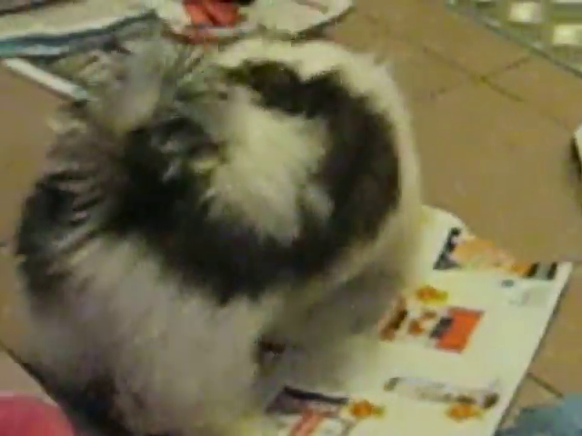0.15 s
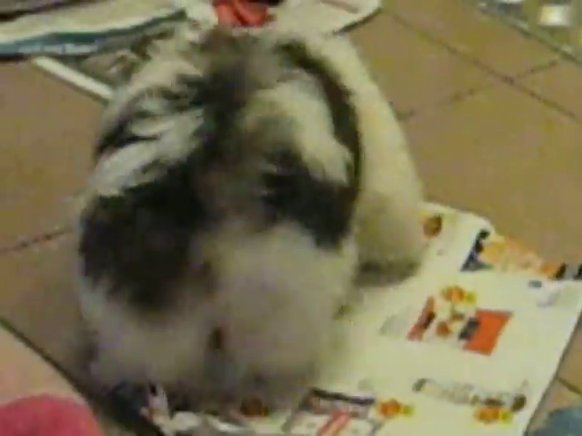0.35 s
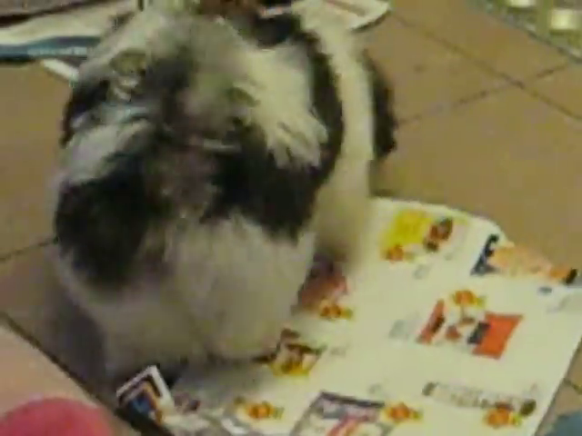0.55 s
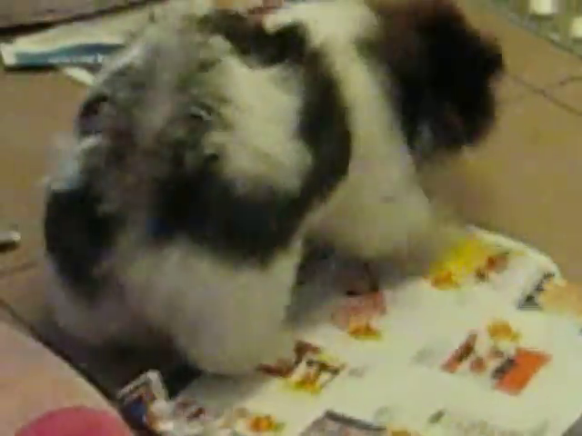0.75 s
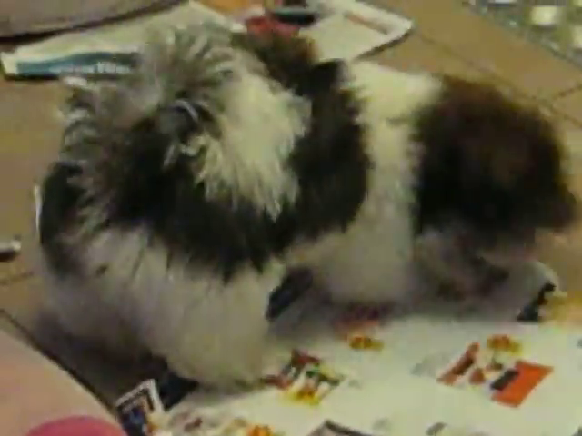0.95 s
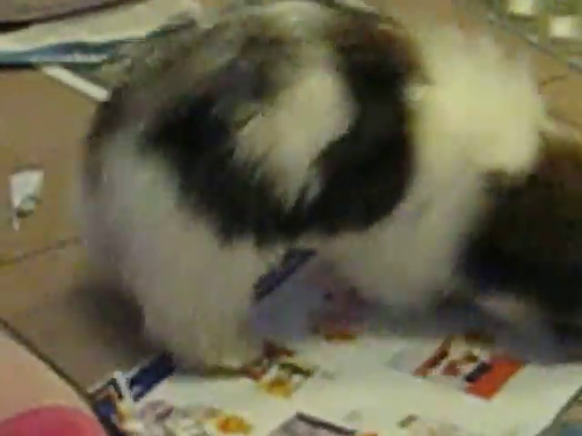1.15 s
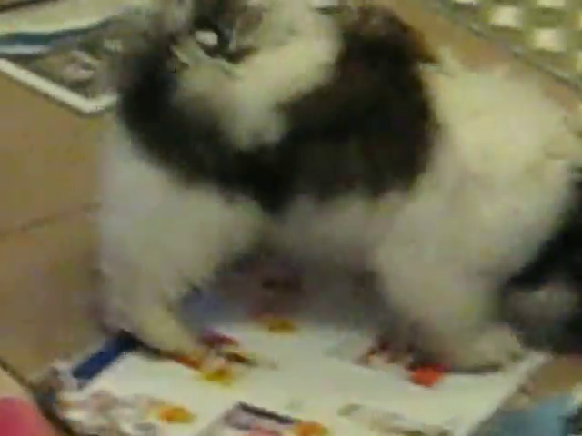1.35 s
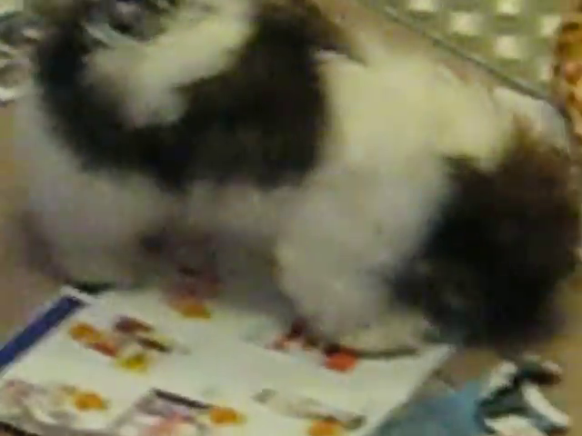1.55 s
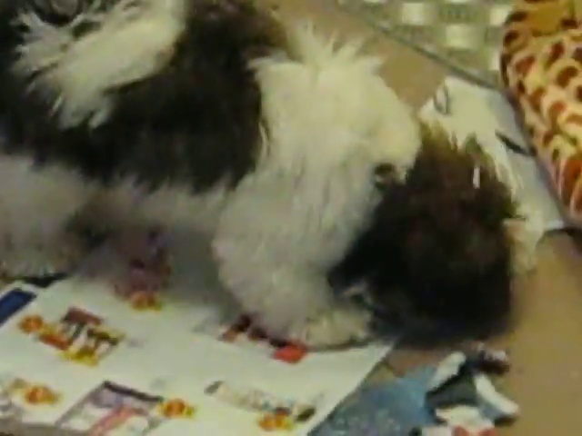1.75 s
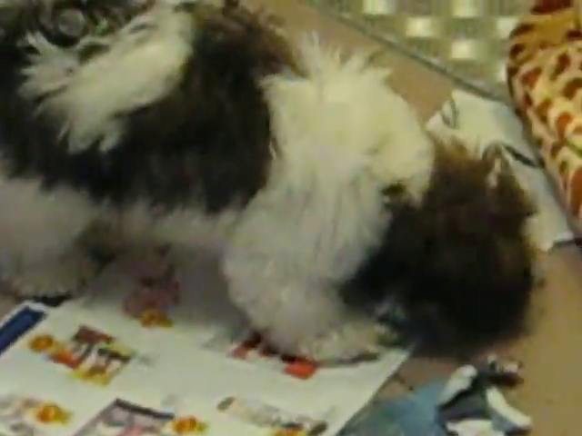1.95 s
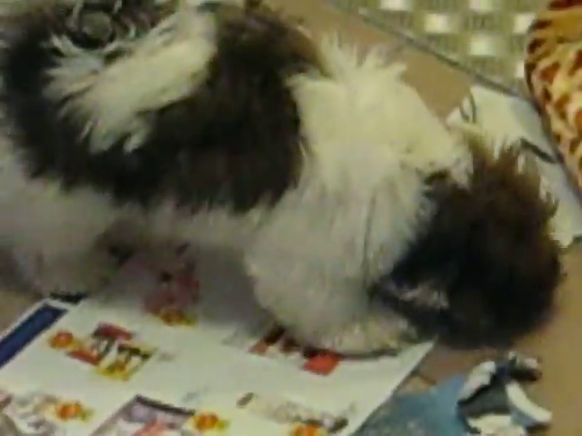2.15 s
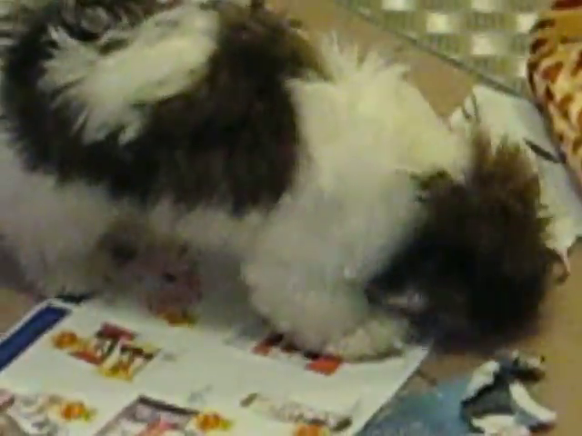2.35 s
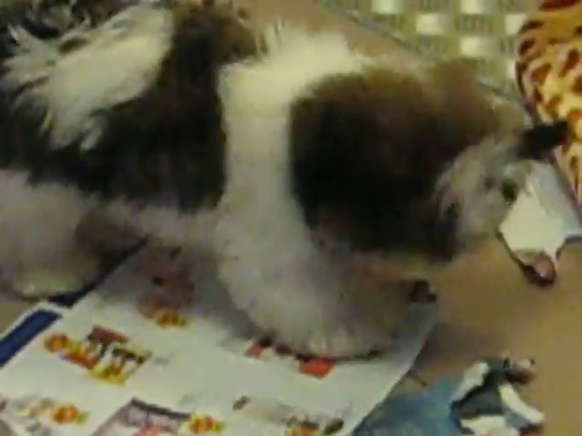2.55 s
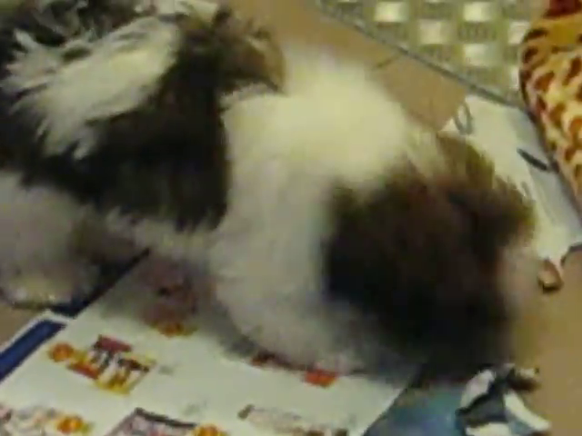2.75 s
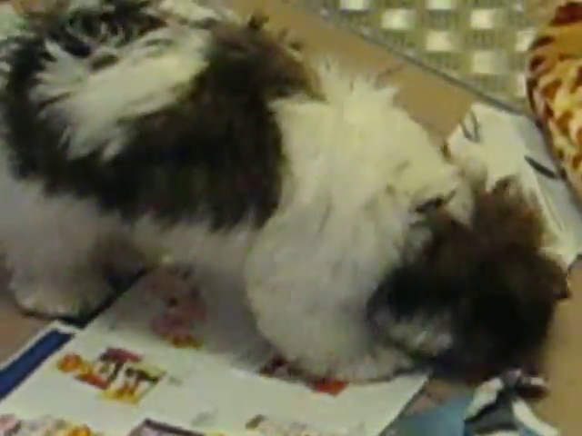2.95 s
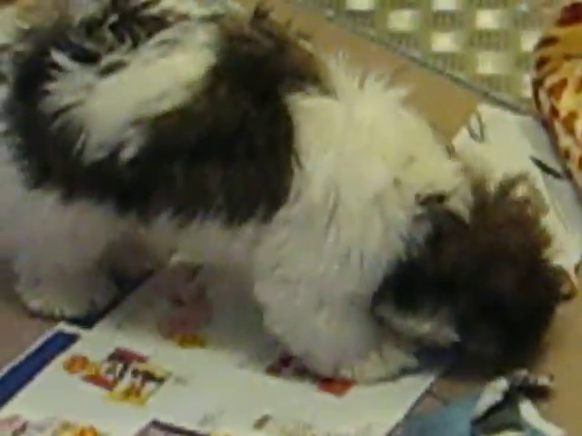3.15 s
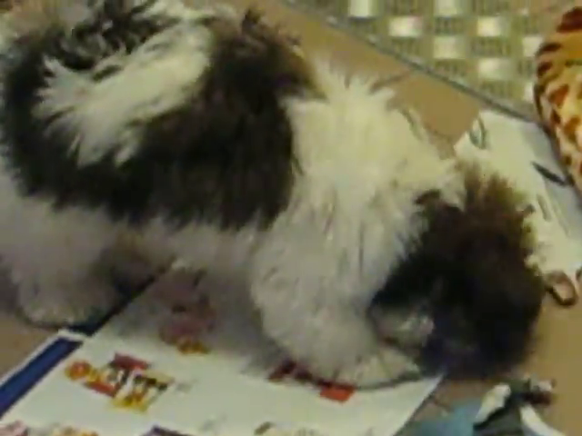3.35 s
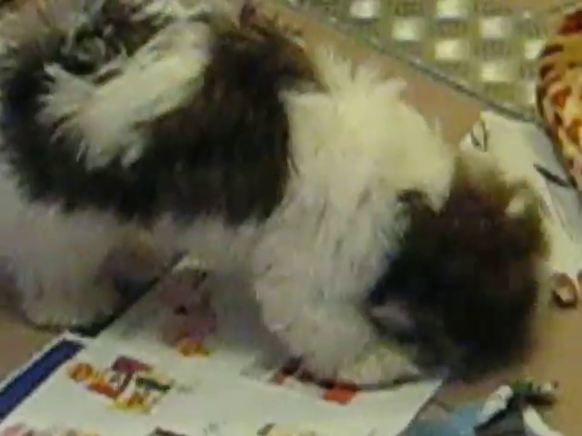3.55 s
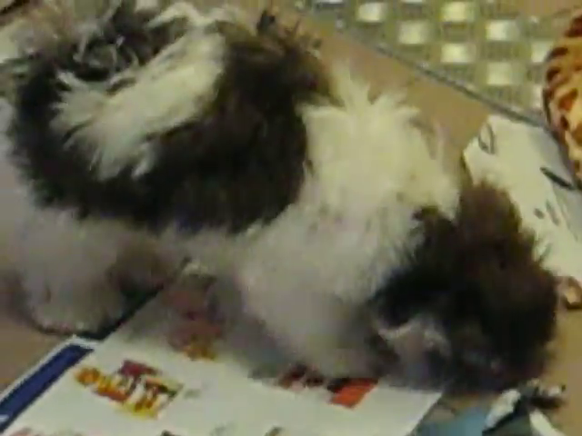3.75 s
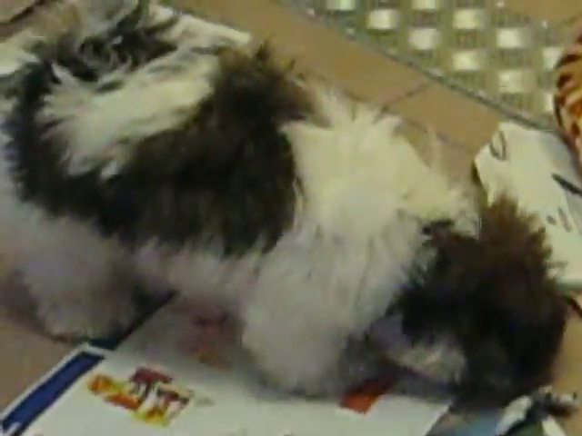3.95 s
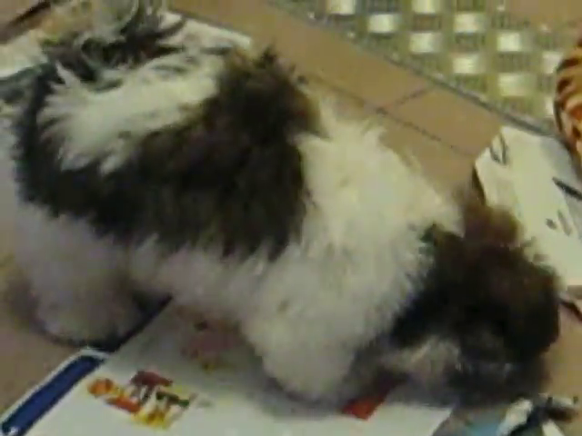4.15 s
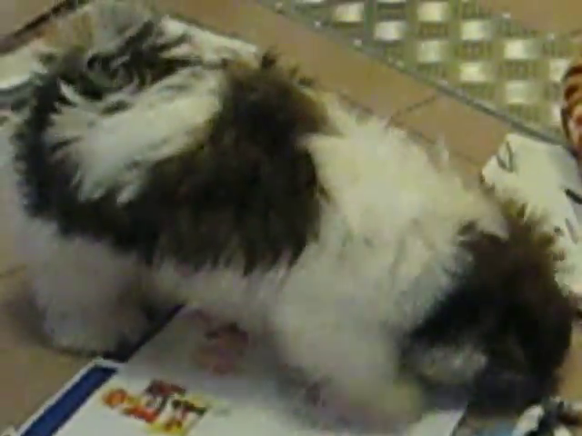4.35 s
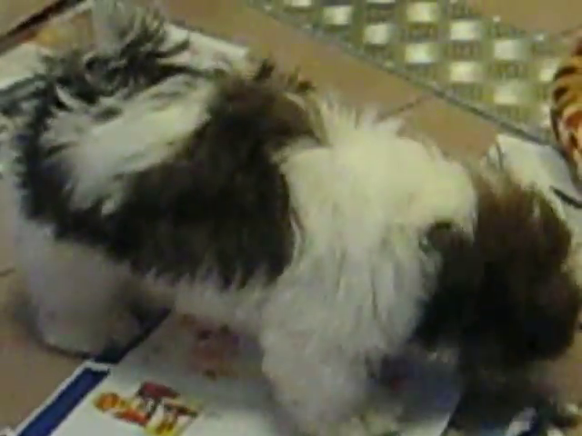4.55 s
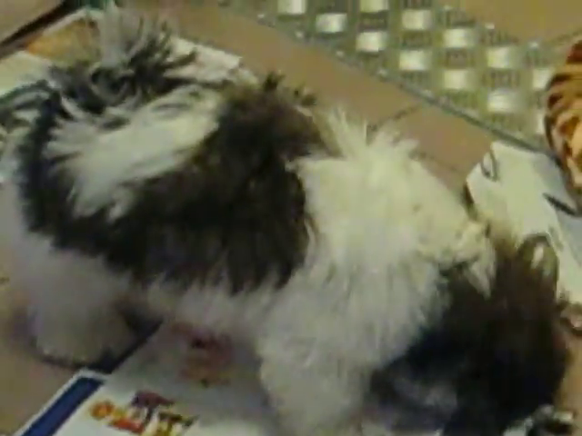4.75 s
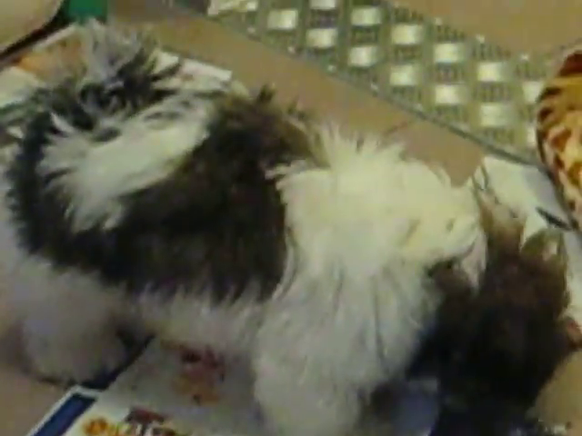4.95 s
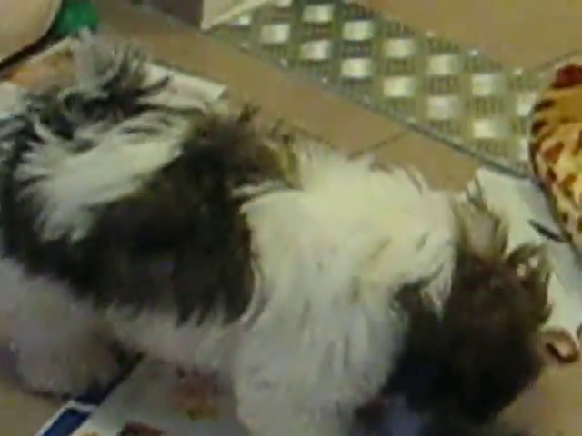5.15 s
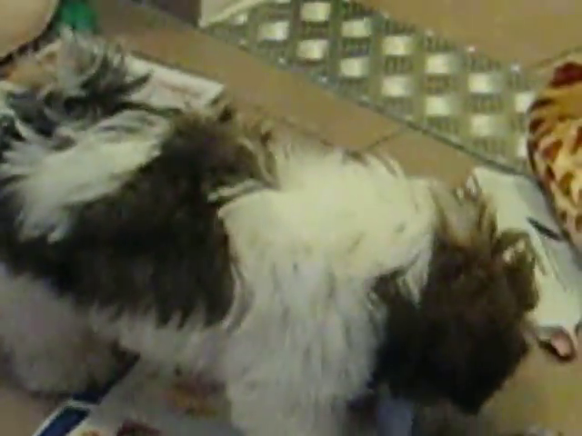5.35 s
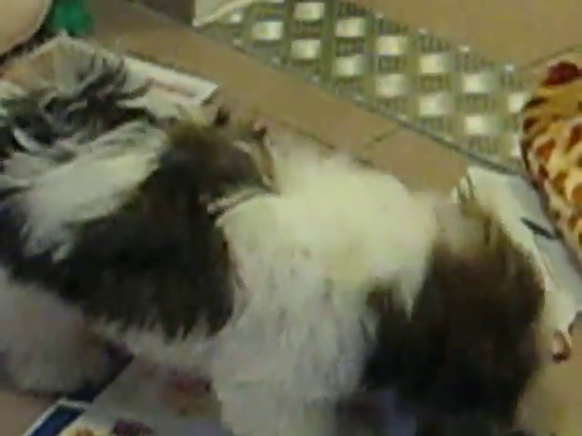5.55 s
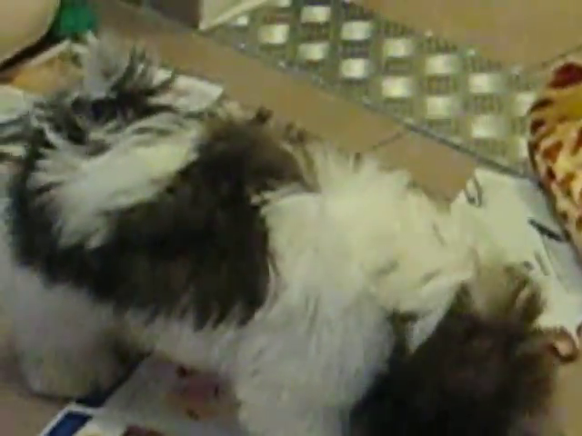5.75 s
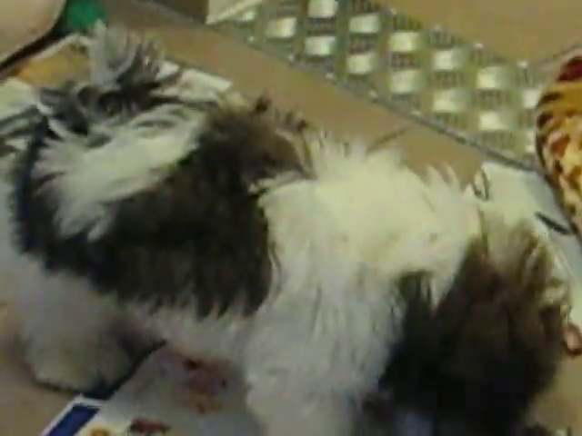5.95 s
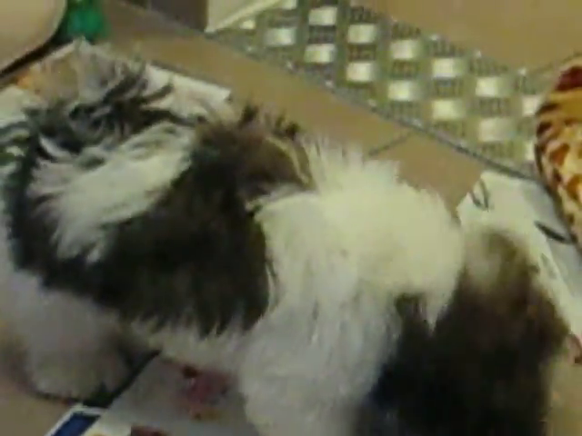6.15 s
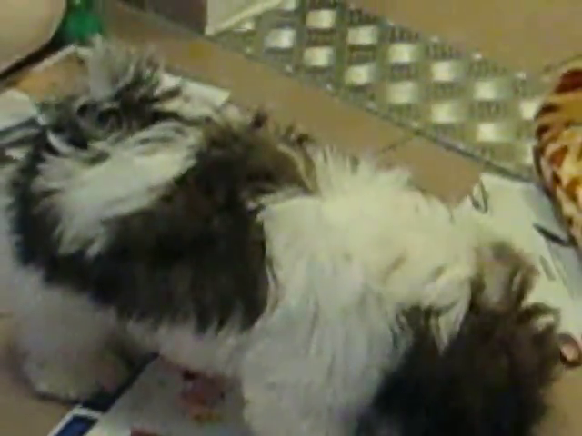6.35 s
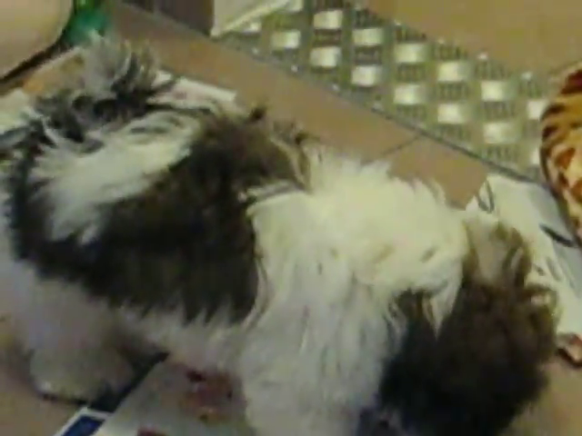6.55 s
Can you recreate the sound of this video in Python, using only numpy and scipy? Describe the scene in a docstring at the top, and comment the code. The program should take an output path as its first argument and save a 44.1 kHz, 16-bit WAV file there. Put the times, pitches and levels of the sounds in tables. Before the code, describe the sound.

A puppy handles paper on a hard hallway floor, heard close through a small mono camera microphone with constant soft hiss and a thin, very high electronic whine. In the first second, light rustling carries a very faint low squeak and crisp snaps, strongest near 0.75. Around 1.05, a brief rising squeak, claw scrape, snap and soft paw thuds come together. Rustling thins out until an abrupt, coarse rip at 2.4, which quickly fades. From about 2.7 to 3.8 it is nearly quiet, with only tiny ticks. A bright snap at 4.0 restarts the activity; a cluster follows around 4.35 with light thuds. From 4.7 the crackles thicken, with a strong scraping tear at 5.35. Dense snaps, flaps and heavier crumpling continue from 5.6 to 6.4, then shorter rustles and scrapes run to the end near 6.7. A short hallway echo surrounds the paper.

```python
"""A puppy tramples, tugs and tears sheets of paper on a hard hallway floor, close to a small mono camera.
Creases snap as short ring pairs with noise bursts; rustle is clumped random crackles shaped by moving humps.
Claws rasp as noise through resonances, paws thud as dying low modes, soft squeaks slide in pitch.
Sparse random taps ring as the hallway; the camera adds shaped-noise hiss and a thin high whine of sines."""
import sys
import numpy as np
from scipy import signal
from scipy.fft import rfft, irfft
from scipy.io import wavfile
from scipy.ndimage import uniform_filter1d

SR = 44100
rng = np.random.default_rng(int(sys.argv[2]) if len(sys.argv) > 2 else 0)


def ratio(d):
    """dB to gain"""
    e = np.asarray(d, float) / 20
    return 10 ** e


def master(y):
    """Save y as 16-bit WAV."""
    cut = np.clip(np.atleast_2d(y).T, -1, 1)
    pcm = np.round(cut * 32767)  # scale
    wavfile.write(sys.argv[1], SR, pcm.astype(np.int16))


N = 295470

# louder creases that snap: (time [s], relative level [dB], low ring [Hz],
# treble balance re level [dB], flap balance re level [dB])
CREASE_SNAPS = [(0.3454, -30, 5520, -15, -27), (0.4289, -21, 5600, -23, -33), (0.7344, -30, 6650, -10, -36),
                (0.7569, -5, 5850, -8, -39), (0.7678, -15, 6710, -14, -33), (1.0696, -11, 2370, -36, -14),
                (1.09, -22, 5490, -15, -32), (1.1114, -21, 5500, 2, -32), (1.3015, -25.5, 3600, -1, -30),
                (1.7797, -32, 4600, 3, -30), (1.797, -32, 7140, -17, -26), (1.86, -32, 7180, 0, -25),
                (2.37, -29, 2110, 3, -20), (2.3748, -26, 1990, 4, -6), (2.392, -16, 4850, -4, -22),
                (2.422, -14, 4850, 3, -30), (2.428, -13, 2090, 5.5, -15), (3.304, -41, 2590, -5, -16),
                (3.3204, -40, 6850, 2, -15), (3.676, -40.5, 6850, 4, -24), (3.8472, -31, 5570, -28, -28),
                (3.8731, -19.5, 6750, -29, -36), (3.9786, -5, 6500, -2, -39), (4.0045, -11, 7120, -18, -42),
                (4.201, -21.5, 6470, -20, -27), (4.2294, -19.5, 6000, -8, -31), (4.261, -19, 6350, -6, -38),
                (4.271, -27, 7000, 0, -30), (4.3361, -9.5, 5850, -12, -32), (4.352, -8, 6680, -19, -16.5),
                (4.36, -10.5, 4100, -16, -26), (4.3828, -12, 6800, -9, -27), (4.5512, -30, 3440, -19, -27),
                (4.6604, -15.5, 3130, -29, -35), (4.6714, -30, 3120, -26, -12),
                (4.6832, -18, 4000, -29, -29), (4.7424, -21, 3900, -26, -26), (4.81, -15, 3600, -26, -32),
                (4.8284, -19, 2340, 5, -41), (4.8396, -9.5, 4800, -20, -21),
                (4.8466, -13.5, 3600, -19, -2.5), (4.894, -14, 6000, -16, -16),
                (4.9101, -12, 5850, -10, -49), (4.924, -22, 4120, -10, -31), (5.0164, -19, 2450, -27, -28),
                (5.0499, -21.5, 1600, -16, -7), (5.106, -27, 3880, -14, -22), (5.1224, -28, 4870, -15, -19),
                (5.1475, -28, 2470, -3, -27), (5.182, -25, 4150, -8, -17), (5.192, -6.5, 4800, -8, -40),
                (5.231, -15, 5040, -8, -30), (5.246, -9, 4850, -7, -32), (5.2634, -12, 6200, -9, -25),
                (5.2752, -15, 6600, -7, -35), (5.3374, -26, 3530, -15, -28), (5.3471, -3.5, 3840, -6, -29),
                (5.5269, -15.5, 3800, -25, -7), (5.5324, -18.5, 3500, -7, -18),
                (5.5811, -14.5, 2330, -5, -30), (5.6137, -9.5, 3510, 0.5, -36),
                (5.6286, -4.5, 5430, -9, -33), (5.715, -13.5, 4300, -7, -30),
                (5.7306, -8.5, 3670, -10, -19), (5.7637, -11, 4320, -7, -18), (5.7881, -19, 1970, 2, -19),
                (5.815, -3.5, 5100, -10, -16), (5.8218, -9, 1650, -23, -17), (5.8863, -19.5, 1740, -7, -23),
                (5.9266, -10.5, 1960, -14, -22), (5.9348, -11, 1940, -10, -8), (5.9503, -5, 6290, -7, -21),
                (5.962, -9, 6770, -18, -21), (6.1117, -23, 3580, -25, -25), (6.1678, -20.5, 1520, -17, -1),
                (6.1903, -3, 3900, -14, -29), (6.2582, -5.5, 4870, -9, -33), (6.277, -12, 5530, -4, -32),
                (6.2884, -12, 3500, -19, -28), (6.3062, -13, 3740, -12, -1), (6.3494, -18.5, 1530, -4, 1),
                (6.3987, -10.5, 4600, -11, -8), (6.415, -14, 2100, -13, -22), (6.621, -20, 3580, -10, -19),
                (6.6479, -16, 2000, -26, -1), (6.6784, -17, 3700, -14, -21)]


def evened(x):
    """Scales to rms 1."""
    return x / np.sqrt(np.mean(x ** 2) + 1e-20)


def read(points, hz):
    """Value of a (Hz, value) table on a log-frequency axis."""
    f, value = np.transpose(points)
    return np.interp(np.log(hz + 1), np.log(f + 1), value)


def add(mix, start_s, sound):
    """Mixes a sound in at start_s."""
    part = mix[round(start_s * SR):][:len(sound)]
    part += sound[:len(part)]


def ring(hz, t60_s, phase_turns, rise_s=0.000071):
    """One dying mode with a quick soft start."""
    t = np.arange(round(min(t60_s, .6) * SR) + 8) / SR
    envelope = ratio(-60 * t / t60_s) * (1 - np.exp(-t / rise_s))
    return envelope * np.sin(2 * np.pi * (hz * t + phase_turns))


def band(x, centre_hz, width_hz):
    """A broad resonance with steep sides."""
    edges_hz = np.clip([centre_hz - width_hz / 2, centre_hz + width_hz / 2], 50, 20000)
    return signal.sosfilt(signal.butter(2, edges_hz, "bandpass", fs=SR, output="sos"), x)


def resonate(x, hz, width_hz):
    """A resonance of gain 1: shift to 0 Hz, one-pole lowpass, shift back."""
    turn = np.exp(2j * np.pi * hz * np.arange(len(x)) / SR)
    r = np.exp(-np.pi * width_hz / SR)
    return 2 * (turn * signal.lfilter([1 - r], [1, -r], x / turn)).real


def movement(t):
    """Tugs swell and fade over the idle rustle; their power-weighted mean sets body colour and bass weight."""
    # single tugs, steps and tears: (peak time [s], rise per 20 dB [s], fall per 20 dB [s],
    # relative peak level [dB], body centre [Hz], bass weight [dB])
    tug_table = [(0, .05, 0.063, -39.5, 5480, -16), (.43, 0.11, 0.28, -37.5, 5500, -8),
                 (.49, 0.13, 0.04, -33, 5330, -30), (.758, 0.034, 0.17, -35, 6300, -18),
                 (1.075, 0.013, 0.16, -40, 2790, -5.5), (1.13, 0.088, 0.25, -37, 5450, -6),
                 (1.33, 0.15, 0.095, -44.5, 4350, -10.5), (1.48, 0.08, 0.29, -49.5, 5560, -4),
                 (1.82, 0.12, .3, -51, 5000, -6.5), (2.376, 0.011, .1, -34.5, 3000, -1),
                 (2.394, .008, 0.24, -23.5, 4300, -6.5), (2.431, 0.046, 0.12, -19.5, 3780, -5.5),
                 (3.88, 0.092, 0.064, -53, 5360, -20), (3.98, .012, 0.18, -38, 6340, -23),
                 (4.01, 0.049, 0.12, -33.5, 5240, -20), (4.23, 0.066, 0.31, -39.5, 5070, -19),
                 (4.35, .04, 0.088, -32.5, 4370, -13.5), (4.4, 0.1, 0.11, -34, 3950, -7),
                 (4.66, 0.14, 0.24, -41.5, 3200, -3), (4.78, .2, .15, -52.5, 4480, -17),
                 (4.83, 0.026, 0.17, -36.5, 3700, -6), (4.93, .3, 0.095, -40, 5520, -14),
                 (5.02, .02, .09, -39.5, 3230, -11), (5.055, .012, .15, -45.5, 2850, 3),
                 (5.19, .04, 0.24, -37, 4700, -13.5), (5.28, 0.2, 0.028, -32, 5170, -9.5),
                 (5.348, 0.011, .058, -21.5, 3860, -6), (5.53, .02, 0.22, -40, 3660, -4),
                 (5.582, .012, .15, -34.5, 3080, -1), (5.625, 0.052, 0.11, -27.5, 4200, -6),
                 (5.74, 0.12, 0.27, -37, 4080, -5), (5.82, 0.14, 0.061, -25, 4300, -3),
                 (5.928, .012, 0.13, -23.5, 3730, -4.5), (5.97, 0.2, 0.058, -27, 4900, -8.5),
                 (6.12, 0.075, 0.34, -42.5, 3320, -3), (6.172, 0.01, .1, -35, 4000, 7.5),
                 (6.192, 0.018, 0.04, -22, 4230, -5), (6.29, 0.22, 0.21, -27.5, 4030, -11),
                 (6.36, 0.044, 0.41, -45, 3000, 3), (6.43, 0.22, 0.076, -34, 3160, 0),
                 (6.508, .008, 0.11, -27, 4060, -8.5), (6.533, .06, 0.057, -29, 3820, 2.5),
                 (6.65, 0.063, .5, -36.5, 3020, -5)]
    # slow state of the sheet: (time [s], relative idle level [dB], treble crispness [dB])
    sheet_table = [(0, -52, -10), (.22, -52.5, 6), (.47, -52, 2.5), (.62, -47.5, 4.5), (.8, -52, 4),
                   (1.04, -54, -3.5), (1.35, -64, 6), (1.85, -75, 7), (2.1, -58.5, -5), (2.33, -50.5, -0.5),
                   (2.65, -55.5, -18), (3.2, -59, -3), (3.8, -57.5, -3), (4.0, -52, -5), (4.5, -49.5, -12),
                   (5.1, -50.5, -27), (5.5, -44, -6.5), (5.95, -49, -4), (6.3, -50, -11.5),
                   (6.7, -53, -2.5)]
    swell_db = 20
    idle_body_hz, idle_weight_db = 4200, -8.5
    s, idle_db, crisp_db = np.transpose(sheet_table)
    peak_s, rise_s, fall_s, db, hz, heavy_db = np.transpose(tug_table)[:, :, None]
    away = np.maximum((peak_s - t) / np.maximum(rise_s, .005), (t - peak_s) / np.maximum(fall_s, .005))
    tugs = ratio(db - swell_db * away) ** 2
    idle = ratio(np.interp(t, s, idle_db)) ** 2
    power = tugs.sum(0) + idle
    level_db = 10 * np.log10(power)
    body_hz = ((tugs * hz).sum(0) + idle * idle_body_hz) / power
    weight_db = ((tugs * heavy_db).sum(0) + idle * idle_weight_db) / power
    # harder movement stiffens the sheet: 21 Hz per dB
    flap_hz = np.clip(1260 + 21 * (level_db + 30), 400, 1500)
    return level_db, body_hz, np.interp(t, s, crisp_db), weight_db, flap_hz


def crackles():
    """Clumped tiny crackles over faint noise, with sparse stronger crease snaps at random."""
    crackles_per_s, spread_db = 8000, 2.1
    creases_per_s, crease_db = 80, 12
    clumps = ratio(2.0 * evened(uniform_filter1d(rng.standard_normal(N), 300)))
    size = ratio(spread_db * np.minimum(rng.exponential(1, N), 4)) * rng.standard_normal(N)
    grains = size * (rng.random(N) < crackles_per_s / SR)
    fine = evened(clumps * (grains + .3 * rng.standard_normal(N)))
    creases = rng.standard_normal(N) * (rng.random(N) < creases_per_s / SR)
    return fine + ratio(crease_db) * creases


def rustle():
    """Crackles swell with the movement and run on after each snap; four humps colour them."""
    run_on_db, run_on_share, run_on_t60_s = -24, 0.78, 0.057  # share of the snap's dB
    t = np.arange(N // 64 + 2) * 64 / SR
    level_db, *colour = movement(t)
    kicks = np.zeros(N)
    for s, db, *_ in CREASE_SNAPS:
        kicks[round(s * SR)] += ratio(run_on_db + run_on_share * db) ** 2
    run_on = signal.lfilter([1], [1, -ratio(-120 / run_on_t60_s / SR)], kicks)  # as power
    level = np.sqrt(ratio(np.interp(np.arange(N) / SR, t, level_db) - 5.5) ** 2 + run_on)

    hz, frames_s, z = signal.stft(level * crackles(), SR, nperseg=256, noverlap=192)
    body_hz, crisp_db, weight_db, flap_hz = (np.interp(frames_s, t, c) for c in colour)
    humps = [(flap_hz, 1, weight_db),  # (centre Hz, width octaves, dB)
             (body_hz, 1, 0 * frames_s),
             (8300, 0.85, crisp_db),
             (400, 0.62, weight_db - 11.5)]  # the whole sheet pushes air along with the flap
    power = 0
    for centre_hz, octaves, db in humps:
        hump = np.exp(-(np.log2((hz[:, None] + 1) / centre_hz) / octaves) ** 2) + 0 * frames_s
        power = power + ratio(db) ** 2 * hump / hump.mean(0)
    # the bending sheet favours other bands from moment to moment
    patches = rng.standard_normal((len(frames_s), len(hz))).T
    patches = evened(uniform_filter1d(uniform_filter1d(patches, 5, 0), 24, 1))
    patchy_db = 1.6
    coloured = z * np.sqrt(power) * ratio(patchy_db * patches)
    return signal.istft(coloured, SR, nperseg=256, noverlap=192)[1][:N]


def hiss():
    """Steady shaped-noise hiss that the camera adds."""
    # noise spectrum: (frequency [Hz], relative density [dB])
    hiss_table = [(15, -4), (40, -1), (200, 1.5), (600, -1), (2000, -4.5), (5000, -10), (11500, -11.5),
                  (13400, -14), (14500, -11.5), (15700, -11.5)]
    level_db = -52.5
    hz = np.fft.rfftfreq(N, 1 / SR)
    spectrum = rfft(rng.standard_normal(N)) * ratio(read(hiss_table, hz))
    return ratio(level_db) * evened(irfft(spectrum, N))


def whine():
    """Camera electronics: tone and octave restart each picture frame, a chirr near its start, steady side tones."""
    # faint steady tones: (frequency [Hz], level [dB])
    side_table = [(7882, -72), (11551, -72)]
    frames_per_s, whine_hz, whine_db, octave_db = 30, 7569.3, -51.5, -58.5
    chirr_hz, chirr_width_hz, chirr_db = 12050, 150, -68
    t = np.arange(N) / SR
    in_frame_s = (t + .001) % (1 / frames_per_s)
    phase = 2 * np.pi * whine_hz * in_frame_s
    tones = ratio(whine_db) * np.cos(phase) + ratio(octave_db) * np.cos(2 * phase)
    side_tones = sum(ratio(db) * np.sin(2 * np.pi * hz * t) for hz, db in side_table)
    opening = (in_frame_s > .002) & (in_frame_s < .012)
    chirr = opening * evened(band(rng.standard_normal(N), chirr_hz, chirr_width_hz))
    return tones + side_tones + ratio(chirr_db) * chirr


def faint_tones():
    """Soft, slightly fuzzy squeaks that slide in pitch, with a weaker octave."""
    # squeaks nearby: (start [s], end [s], start pitch [Hz], end pitch [Hz], level [dB], octave re tone [dB])
    squeak_table = [(.12, .33, 425, 418, -67, -30), (.99, 1.05, 620, 710, -54, -7)]
    out = np.zeros(N)
    for start_s, end_s, from_hz, to_hz, db, octave_db in squeak_table:
        n = round((end_s - start_s) * SR)
        waver = 1 + .6 * evened(uniform_filter1d(rng.standard_normal(n), 900))
        phase = 2 * np.pi * np.cumsum(np.linspace(from_hz, to_hz, n)) / SR
        tone = np.sin(phase) + ratio(octave_db) * np.sin(2 * phase)
        add(out, start_s, ratio(db) * waver * signal.windows.tukey(n, .6) * tone)
    return out


def rasps():
    """Claws and paper edges scrape: noise through two equal resonances in series, fading 12 dB."""
    # scrapes: (start [s], length [s], pitch [Hz], width of each resonance [Hz], starting level [dB])
    rasp_table = [(0.29, .05, 2200, 450, -56), (.47, 0.046, 2500, 580, -43.5),
                  (1.068, 0.14, 5480, 1100, -35.5), (1.067, 0.097, 2300, 780, -39.5),
                  (2.39, 0.096, 2210, 340, -35), (2.389, .035, 7300, 6900, -25),
                  (1.297, 0.024, 3550, 300, -44), (1.778, 0.054, 4570, 370, -54),
                  (1.779, 0.038, 8600, 1100, -41), (3.845, 0.015, 5400, 890, -41),
                  (5.350, .12, 2690, 100, -39), (4.9, 0.037, 3700, 300, -33),
                  (5.349, 0.085, 5540, 300, -39), (5.354, 0.053, 1106, 280, -44),
                  (5.526, 0.03, 3550, 910, -32.5), (5.926, 0.033, 2000, 270, -37),
                  (6.345, .03, 800, 630, -29.5), (7.2, 0.029, 1990, 250, -40), (6.52, 0.14, 834, 210, -42),
                  (6.644, 0.0218, 1980, 560, -42)]
    out = np.zeros(N)
    grit = rng.standard_normal((len(rasp_table), SR // 4))
    for (s, length_s, hz, width_hz, db), noise in zip(rasp_table, grit):
        t = np.arange(round(length_s * SR)) / SR
        tone = evened(resonate(resonate(noise, hz, width_hz), hz, width_hz))[-len(t):]
        add(out, s, ratio(db - 12 * t / length_s) * signal.windows.tukey(len(t), .15) * tone)
    return out


def snaps():
    """A crease buckles: two short rings, a low slap of air and a spray of noise in the first milliseconds."""
    out, count = np.zeros(N), len(CREASE_SNAPS)
    chance = rng.random((count, 4))
    spray = rng.standard_normal((count, 256)) * ratio(-60 * np.arange(256) / SR / 0.006)
    slaps = rng.standard_normal((count, 768)) * ratio(-60 * np.arange(768) / SR / 0.0093)
    for (s, db, low_hz, high_db, flap_db), luck, puff, slap in zip(CREASE_SNAPS, chance, spray, slaps):
        add(out, s, ratio(db - 1.0) * ring(low_hz, 8 / low_hz, luck[0], rise_s=0.0001))
        add(out, s, ratio(db + high_db + 6) * ring(8300 + 2500 * luck[3], .002, luck[1]))
        add(out, s, ratio(db + high_db - 7) * band(puff, 9400, 8900))
        add(out, s, ratio(db + flap_db + 1.0) * band(slap, 700 + 900 * luck[2], 1200))
    return out


def thuds():
    """A paw landing gives a soft low thud: one dying mode."""
    # paws landing: (time [s], level [dB], pitch [Hz], t60 [s])
    thud_table = [(1.076, -34, 198, 0.12), (1.110, -36, 200, 0.11), (4.375, -41, 440, 0.053),
                  (4.410, -37.5, 363, 0.061), (5.342, -36, 380, .05), (5.528, -38, 179, .1)]
    out = np.zeros(N)
    for s, db, hz, t60_s in thud_table:
        add(out, s, ratio(db) * ring(hz, t60_s, 0, rise_s=0.00093))
    return out


def hallway(x):
    """Three tails of sparse random taps, fed in turn, each band dying at its own speed."""
    # decay of the hallway: (frequency [Hz], t60 [s])
    decay_table = [(300, 0.45), (1300, 0.49), (3500, 0.43), (9000, 0.28), (15000, 0.11)]
    taps = np.zeros((3, SR // 2))
    slots = np.arange(80, SR // 2 - 12, 12)
    at = slots + rng.integers(0, 12, (3, len(slots)))
    np.put_along_axis(taps, at, rng.choice([-1., 1.], at.shape), 1)
    hz, t, z = signal.stft(taps, SR, nperseg=128)
    t60_s = np.clip(read(decay_table, hz), .05, 2)[:, None]
    tails = signal.istft(z * ratio(-60 * t / t60_s), SR, nperseg=128)[1]
    turn = np.pi * (7 * np.arange(N) / SR + np.arange(3)[:, None] / 3)
    feeds = np.sqrt(2 / 3) * np.cos(turn) * x
    return signal.oaconvolve(feeds, tails / np.linalg.norm(tails[0]), axes=1)[:, :N].sum(0)


def scene():
    """Everything reaches one microphone; hiss and whine come after its capsule; both channels are equal."""
    hall_db = -7
    near = rustle() + faint_tones() + rasps() + snaps() + thuds()
    capsule = signal.butter(2, [194, 12860], "bandpass", fs=SR, output="sos")  # Hz
    heard = signal.sosfilt(capsule, near + ratio(hall_db) * hallway(near))
    return np.tile(heard + hiss() + whine(), (2, 1))


def band_limit(x):
    """A steep low-pass at the top of the band."""
    return signal.sosfilt(signal.butter(12, 16650, fs=SR, output="sos"), x)


def record(dry):
    """A steep lowpass limits the band."""
    edge_hz = 15730
    lowpass = signal.firwin(2047, edge_hz, window=("kaiser", 9), fs=SR)
    mix = signal.oaconvolve(dry, lowpass[None], "same")
    return band_limit(mix)


dry = scene()
out = record(dry)
master(out)
```